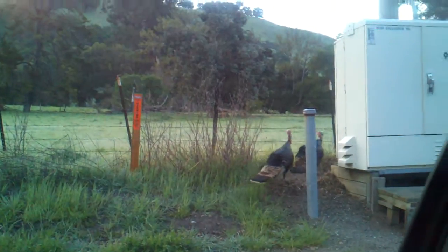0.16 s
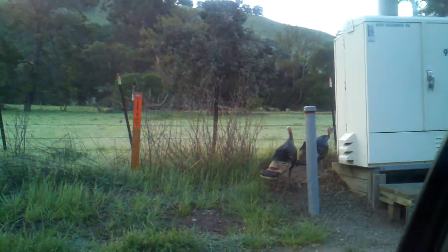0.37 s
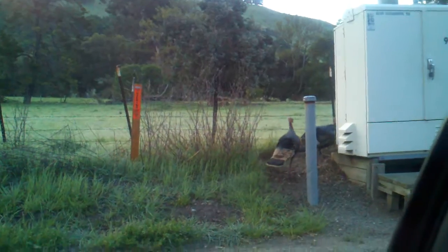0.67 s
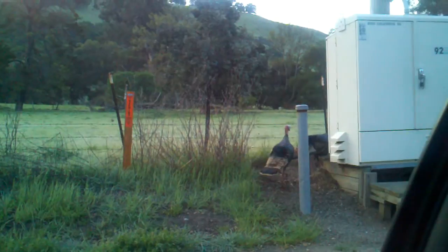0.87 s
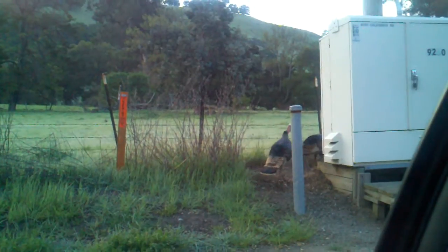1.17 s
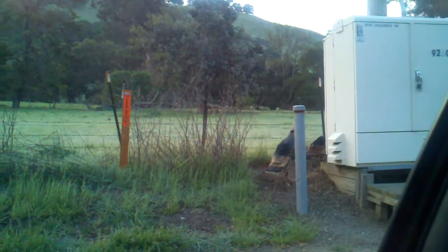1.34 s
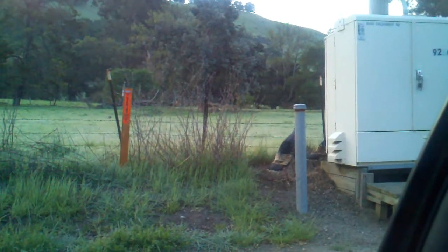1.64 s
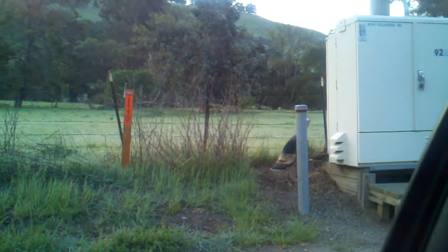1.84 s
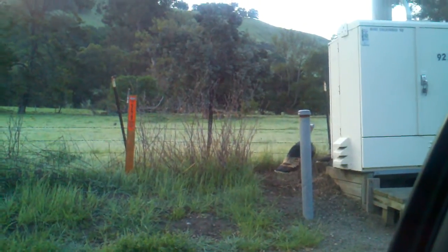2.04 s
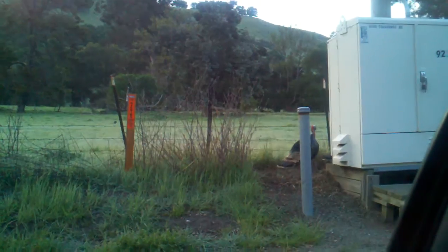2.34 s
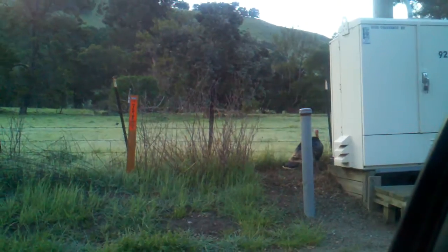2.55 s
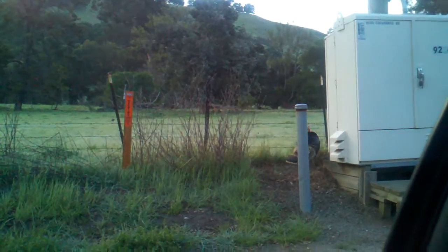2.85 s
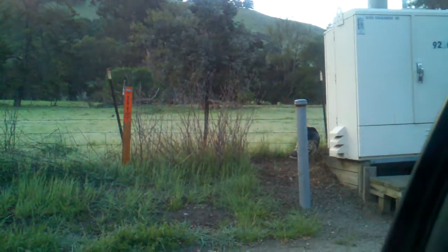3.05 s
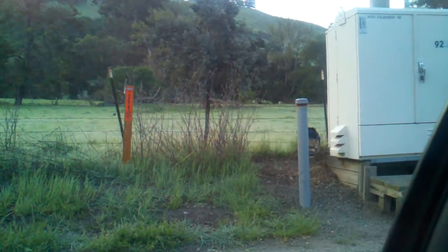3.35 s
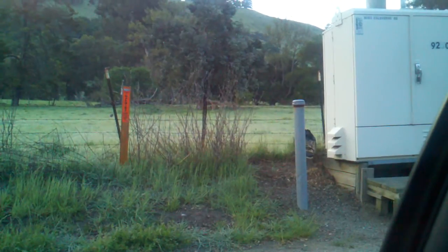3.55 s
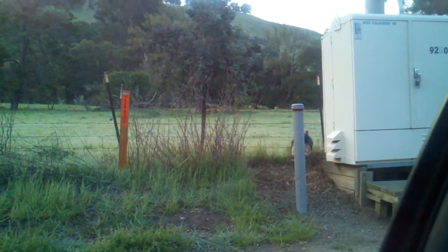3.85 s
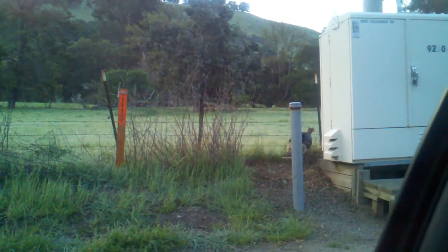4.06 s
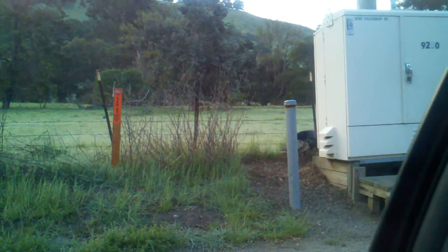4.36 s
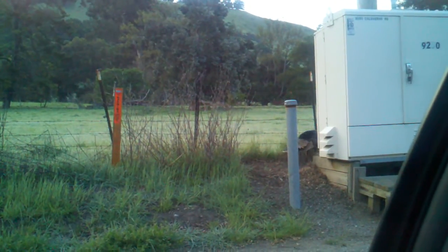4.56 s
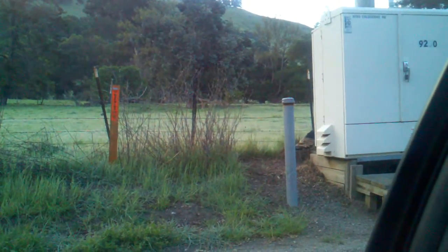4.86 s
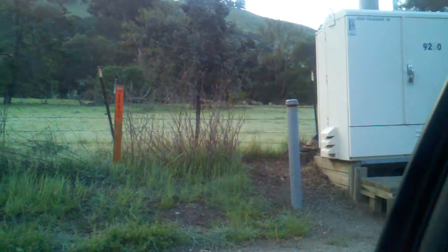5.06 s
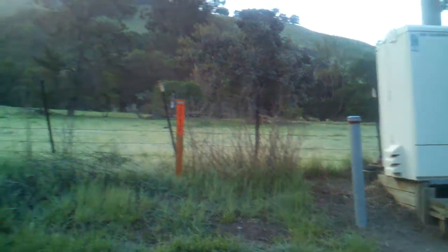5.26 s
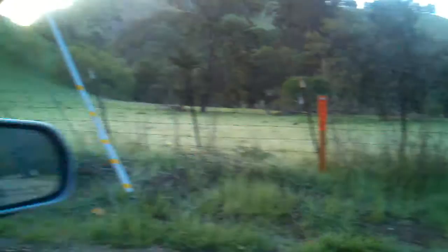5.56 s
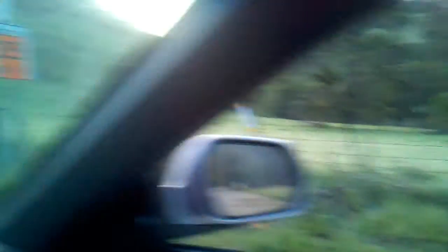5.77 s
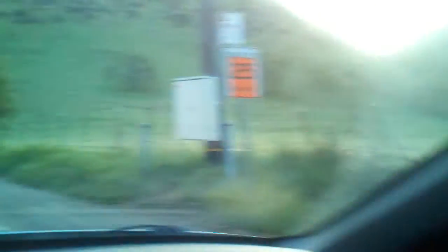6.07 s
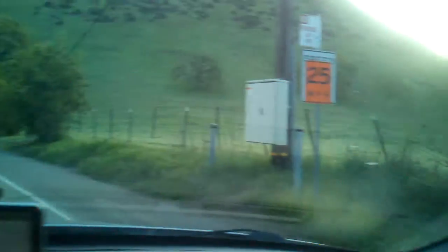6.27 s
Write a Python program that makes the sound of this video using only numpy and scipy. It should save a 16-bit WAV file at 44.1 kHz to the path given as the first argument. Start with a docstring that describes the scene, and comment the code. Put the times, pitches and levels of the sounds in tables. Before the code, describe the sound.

A quiet roadside heard from inside an idling car through its open window. A low, slightly wavering engine hum, soft rumble and faint bright hiss continue throughout, with a tiny tick near 0.4 s. At 1.0 s a turkey gobbles loudly, harsh and bright at first, then tumbling through rapid swooping yelps and hollow arched notes until about 1.95 s, with a short cabin ring. Thin, very high songbird whistles begin near 1.6 s and recur until about 4.7 s. A soft airy swish rises at 2.1 s and fades by 3 s. Faint turkey clucks come between 2.75 and 2.96 s and at 4.27 s; small crackles come at 3.1 s. Falling bird chips sound around 4.6, 5.4 and 6.2 s. From 5.2 to 5.7 s the handheld camera makes dull bumps, strongest near 5.35 s, plus a sharper tick at 5.65 s, then rustling grows until the end at about 6.4 s.

```python
"""A wild turkey gobbles once at a roadside, heard through the open window of an idling car.
The gobble tumbles through high swoops and low arched notes, summed from overtones and puffs of air.
Soft clucks and thin songbird whistles are gliding near-pure tones; a soft hiss swells after the gobble.
Small noise ticks come early, midway and near the end; a late turn of the camera brings bumps and a rustle.
Underneath are the engine's hum lines, a low rumble and a steady hiss in each channel."""
import sys
import numpy as np
from scipy import signal
from scipy.fft import rfft, irfft, next_fast_len
from scipy.io import wavfile
from scipy.ndimage import map_coordinates

SR = 44100
rng = np.random.default_rng(int(sys.argv[2]) if len(sys.argv) > 2 else 0)


def waveform_to_disk(signal):
    """Save audio, clipped to [-1, 1], as 16-bit WAV at the path in sys.argv[1]."""
    frames = np.transpose(np.atleast_2d(signal))
    scaled = np.clip(frames, -1, 1) * 32767
    samples = np.round(scaled).astype(np.int16)
    wavfile.write(sys.argv[1], SR, samples)


N = 283141  # length of the scene [samples]

# The low voice, one curve a note; most arch and droop: (time [s], pitch [Hz], level before the window [dB],
# octave overtone over that [dB], higher overtones over that before slope and throat [dB])
LOW_NOTES = [
    [(1.001, 594, -44, 3, -13), (1.014, 630, -47, 4, -2), (1.027, 621, -39, 3, -1.5),
     (1.040, 574, -42, 3, 6), (1.051, 495, -56, -12, 1)],
    [(1.062, 613, -58, 3, -2), (1.072, 680, -45, 4, 2), (1.081, 648, -48, 8, 3), (1.092, 665, -43, 11, -4),
     (1.101, 725, -34, 13, -12), (1.111, 718, -32.5, -6, -13), (1.129, 796, -29, -10, -19),
     (1.146, 700, -32, -16, -17), (1.158, 540, -44, -10, -14)],
    [(1.188, 747, -52, -8, -7), (1.197, 677, -36, -10, -10), (1.204, 607, -28.5, -10, -21),
     (1.212, 628, -47, 13.5, -1), (1.224, 660, -50.5, 10, -1), (1.236, 706, -44.5, 0, -4),
     (1.246, 687, -28, -21, -26), (1.254, 594, -41, -3, -5), (1.261, 527, -47, 7, -2)],
    [(1.276, 752, -48, -7, -9), (1.284, 655, -33, -10, -17), (1.295, 621, -28, -14, -9.5),
     (1.309, 660, -31.5, -17, -17), (1.32, 714, -33, -10, -17), (1.333, 678, -32, -30, -18),
     (1.345, 570, -34.5, -4, -12), (1.352, 507, -49, 4, -10)],
    [(1.382, 772, -54, -14, -14), (1.393, 625, -30.5, -18, -9.5), (1.401, 610, -29.5, -15, -10.5),
     (1.412, 530, -43, 6, -14)],
    [(1.430, 770, -43, -17, -15), (1.444, 623, -29.5, -11, -8), (1.456, 555, -33.5, -4, -21),
     (1.468, 600, -28, -12, -14), (1.48, 630, -30, -13, -10.5), (1.494, 695, -32.5, -17, -19),
     (1.51, 558, -33, -9, -9), (1.519, 480, -51, 11, -12)],
    [(1.548, 740, -59, -12, -15), (1.56, 631, -31, -13, -13.5), (1.569, 598, -31, -12, -12),
     (1.578, 500, -48, 7, -7)],
    [(1.594, 806, -49, -10, -18), (1.605, 666, -33.5, -14.5, -16), (1.613, 560, -36, -10, -11),
     (1.621, 487, -40, 1, -16)],
    [(1.645, 530, -39, -6, -8), (1.652, 575, -32.5, -15, -16), (1.661, 618, -29.5, -16, -15),
     (1.67, 646, -33.5, -10, -12.5), (1.685, 575, -30, -15, -16), (1.693, 480, -48, 7, -5)],
    [(1.718, 718, -52, -2, -25), (1.731, 597, -30, -17, -19), (1.739, 589, -38, -13, -3.5),
     (1.749, 490, -50, 2, 4)],
    [(1.823, 533, -50, -12, -20), (1.832, 520, -35.5, -13, -20), (1.842, 608, -34, -19, -17),
     (1.852, 622, -35.5, -12, -13.5), (1.862, 600, -38.5, -22, -13), (1.87, 523, -34, -10.5, -16),
     (1.876, 495, -53, -16, -16)],
]
# Throat and beak shape the higher overtones: (frequency [Hz], gain [dB])
THROAT_GAIN = [(1200, -4), (1550, -9), (1850, 0), (2100, -5), (2400, -5), (2800, -9), (3500, -3),
               (4200, -10), (6000, -18)]
PITCH_JITTER, STRAIN = .009, 2.5  # unsteadiness of the syrinx; its extra at the start, as a multiple
RUSH_S = .35  # the strain dies down as the air runs out [s]
SLOPE_DB = -16  # fall of the higher overtones [dB per octave]
BURST_DB, BURST_S = 17, .09  # the first push flattens that slope [dB per octave] and passes [s]
RATTLE, RATTLE_PER_S = .07, 520  # depth and pace [knots per s] of the throat's irregular rattle
EDGE_S = .002  # the syrinx opens and closes this quickly [s]


def low_voice(flutter_db=2, count=8):
    """Arched notes from one side of the syrinx, brighter and rougher at first; also its opening."""
    voice, opening = np.zeros(N), np.zeros(N)
    k = np.arange(1, count + 1)[:, None]  # multiples of the pitch
    for note in LOW_NOTES:
        t = np.arange(note[0][0], note[-1][0], 1 / SR)
        pitch, level_db, octave_db, higher_db = curves(note, t)
        age = t - LOW_NOTES[0][0][0]  # since the start of the call
        unsteady = 1 + STRAIN * np.exp(-age / RUSH_S)
        jittered_pitch = pitch * (1 + PITCH_JITTER * unsteady * waver(633, t))
        phase = 2 * np.pi * np.cumsum(jittered_pitch) / SR

        slope_db = SLOPE_DB + BURST_DB * np.exp(-age / BURST_S)
        throat_db = along(THROAT_GAIN, k * pitch)
        higher_db = higher_db + slope_db * np.log2(k / 3) + throat_db
        overtone_db = np.where(k == 2, octave_db, higher_db)
        # the membranes close unevenly, so the overtones flutter
        flutter = flutter_db * np.array([waver(260, t) for _ in k])
        overtone_db = (k > 1) * (overtone_db + flutter)

        rattle = 1 + RATTLE * unsteady * waver(RATTLE_PER_S, t)
        edges = np.minimum(np.minimum(t - t[0], t[-1] - t) / EDGE_S, 1)
        partials = amp(level_db + overtone_db) * rattle * edges
        add(voice, t[0], np.sqrt(2) * np.sum(partials * np.sin(k * phase), axis=0))
        add(opening, t[0], np.sin(phase))
    return voice, opening


# Short yelps of the high voice, most overlapping the start of a low note: (time [s], length [s],
# pitch halfway [Hz], slide [octaves per s], level of the fundamental before the window [dB])
HIGH_YELPS = [(1.186, .012, 1150, -22, -41), (1.240, .011, 1060, -14, -36), (1.280, .011, 1060, -18, -32),
              (1.381, .015, 1010, -18, -33.5), (1.429, .015, 1060, -14, -31.5),
              (1.548, .013, 1000, -18, -33.5), (1.591, .016, 980, -20, -35), (1.639, .012, 830, -6, -36.5),
              (1.718, .011, 990, -12, -31), (1.763, .013, 990, -12, -31), (1.823, .010, 780, -8, -35),
              (1.903, .019, 930, 6, -32.5)]
# Overtones of a yelp: (multiple of the pitch, level over the fundamental [dB])
YELP_PARTIALS = [(2, -18), (3, -26), (4, -38)]
SWOOP_S, SWOOP_OCTAVES, SWOOP_DB = .014, .45, -19  # a faint swoop from above leads into each yelp
YELP_ATTACK_S, YELP_RELEASE_S = .002, .005
YELP_JITTER, YELP_RATTLE = .018, .18  # unsteadiness of its pitch and strength


def high_voice():
    """Rough yelps from the other side of the syrinx; they beat against the low notes."""
    voice = np.zeros(N)
    for s, length, hz, slide, db in HIGH_YELPS:
        t = np.arange(-SWOOP_S, length + YELP_RELEASE_S, 1 / SR)
        swoop = SWOOP_OCTAVES * np.maximum(-t / SWOOP_S, 0)
        octaves = slide * (t - length / 2) + swoop
        pitch = hz * 2 ** octaves * (1 + YELP_JITTER * waver(RATTLE_PER_S, t))
        phase = 2 * np.pi * np.cumsum(pitch) / SR
        knots = [t[0], 0, YELP_ATTACK_S, length - YELP_RELEASE_S / 2, t[-1]]
        envelope = np.interp(t, knots, [0, amp(SWOOP_DB), 1, 1, 0])
        rattle = 1 + YELP_RATTLE * waver(RATTLE_PER_S, t)
        overtones = sum(amp(level) * np.sin(round(k) * phase) for k, level in YELP_PARTIALS)
        tone = np.sin(phase) + overtones
        add(voice, s - SWOOP_S, np.sqrt(2) * amp(db) * envelope * rattle * tone)
    return voice


# Air in the gobble: (time [s], level of the rasp before its trim [dB], level of the spray before its trim [dB])
AIR_LEVELS = [(0.99, -107, -84), (1.006, -89, -73), (1.03, -44.5, -56), (1.062, -57, -72), (1.08, -59, -67),
              (1.098, -47, -54.5), (1.134, -42.5, -51.5), (1.172, -71, -80), (1.184, -53, -65.5),
              (1.24, -57, -56), (1.26, -56, -67), (1.324, -46, -60.5), (1.368, -69, -75), (1.388, -48, -68),
              (1.422, -68, -68), (1.438, -45, -67), (1.454, -57, -66), (1.492, -53, -64.5),
              (1.538, -65, -83), (1.552, -59, -72), (1.608, -60, -73), (1.626, -60, -72), (1.67, -67, -68),
              (1.706, -75, -70), (1.734, -58, -73), (1.802, -77, -76), (1.854, -76, -70), (1.892, -84, -74),
              (1.918, -62, -75), (1.96, -72, -72)]
# Colour of the rasp: (frequency [Hz], relative density [dB])
RASP_COLOUR = [(400, -32), (900, 5), (1500, -6), (2200, 3), (3000, 0), (3600, 5), (4400, -6), (5500, -4),
               (9000, -31)]
# Colour of the fine spray: (frequency [Hz], relative density [dB])
SPRAY_COLOUR = [(3000, -10), (5000, 3), (7000, 3.5), (10000, 3.5), (14000, -5.5)]
RASP_TRIM_DB, SPRAY_TRIM_DB = -4, 2


def gobble():
    """Both voices, with a rasp and a fine spray of air that escape once a cycle of the low voice."""
    low, opening = low_voice()
    t = np.arange(N) / SR
    rasp_db, spray_db = curves(AIR_LEVELS, t)
    puffs = unit((1 + .6 * opening) * amp(2 * wobble(250)))
    puffs = puffs * (t > AIR_LEVELS[0][0]) * (t < AIR_LEVELS[-1][0])
    rasp = amp(RASP_TRIM_DB + rasp_db) * noise(RASP_COLOUR)
    spray = amp(SPRAY_TRIM_DB + spray_db) * noise(SPRAY_COLOUR)
    return low + high_voice() + puffs * (rasp + spray)


# Ringing of the car's inside: (frequency [Hz], width [Hz], level over the direct sound [dB])
CABIN_MODES = [(660, 46, -14.5), (1048, 74, -2), (1800, 180, 0.5), (2850, 210, 6), (3480, 86, -4)]


def cabin_ring(hz):
    """The direct sound plus the resonances of the car's inside."""
    ring = 1
    for centre, width, db in CABIN_MODES:
        damping = 1j * hz * width
        ring = ring + amp(db) * damping / (centre * centre - hz * hz + damping)
    return ring


# Soft turkey clucks: (time [s], length [s], start [Hz], middle [Hz], end [Hz], level before the window [dB])
CLUCK_NOTES = [(2.757, 0.04, 1160, 857, 785, -60), (2.865, 0.02, 910, 1085, 860, -51),
               (2.945, 0.0147, 730, 820, 1110, -54), (4.265, 0.015, 1080, 1070, 965, -62.5)]
# The way in through the window: (frequency [Hz], gain [dB])
WINDOW_GAIN = [(300, -13), (430, -7.5), (540, -2.5), (640, -2), (780, 1), (1050, -3), (1250, -3),
               (1430, -1.5), (1620, -6), (1850, -4), (2300, 0.5), (2700, -3), (3500, -2.5), (14000, 0)]
# First bounces between the panes: (frequency [Hz], time to fall 60 dB [s])
PANES_DECAY = [(500, .035), (1100, .04), (4000, .04), (12000, .025)]
# Reverberation of the cabin: (frequency [Hz], time to fall 60 dB [s])
CABIN_DECAY = [(200, .12), (600, .2), (1000, .16), (4000, .15), (12000, .08)]


def turkey(wet_db=-13):
    """Gobble and clucks come in through the window and ring briefly in the cabin."""
    clucks = glides(CLUCK_NOTES, waver_depth=.03, waver_rate=400, flutter_db=1.5)
    call = filtered(gobble() + clucks, lambda hz: amp(along(WINDOW_GAIN, hz)) * cabin_ring(hz))
    # glass throws back the overtones more than the fundamental: (frequency [Hz], gain [dB])
    glass = [(700, -16), (1100, -12), (1500, -14), (2200, -9), (3500, -6)]
    bounces = filtered(echo(call, PANES_DECAY), lambda hz: amp(along(glass, hz)))
    return call + bounces + amp(wet_db) * echo(call, CABIN_DECAY)


# Songbird whistles, and a second bird's lower answers near 7 to 8 kHz: (time [s], length [s],
# pitch halfway [Hz], fall from start to end [Hz], level before the direct and tree gains [dB])
WHISTLE_NOTES = [(1.568, .18, 9530, 198, -59), (1.814, 0.077, 9150, -200, -63.5),
                 (1.885, 0.12, 9270, 257, -61), (1.976, 0.043, 8950, 197, -63),
                 (2.082, 0.073, 7300, 62, -72), (2.43, 0.3, 9250, 302, -64.5),
                 (2.738, 0.14, 7970, -200, -63.5), (2.903, 0.032, 8150, 303, -60),
                 (3.438, 0.094, 9070, 30, -57.5), (3.503, 0.14, 8805, 334, -54),
                 (3.43, 0.24, 7700, 380, -74), (3.638, 0.11, 7960, 250, -63), (3.765, .05, 8130, -300, -60),
                 (4.294, .1, 8920, 77, -60.5), (4.374, 0.14, 8670, 336, -61.5),
                 (4.518, 0.15, 7780, 418, -65)]
# Another small bird's falling chips: (time [s], pitch halfway [Hz], direct level [dB])
CHIP_NOTES = [(4.608, 3460, -65), (4.640, 3300, -66), (5.394, 3700, -57), (5.422, 3670, -57),
              (5.459, 3540, -65), (6.198, 3730, -70), (6.234, 3620, -65), (6.270, 3540, -71)]
# Tail among the trees: (frequency [Hz], time to fall 60 dB [s])
TREES_DECAY = [(1000, .35), (9000, .42)]
WHISTLE_BOW_HZ = 40.4  # arch of each whistle
CHIP_S, CHIP_FALL_HZ, CHIP_BOW_HZ = .015, 680, 90  # length, fall and arch of every chip


def songbirds(direct_db=-3, wet_db=-5, chip_wet_db=-12):
    """Thin whistles and short chips, smeared by the trees."""
    whistle_rows = [falling(*row, bow_hz=WHISTLE_BOW_HZ) for row in WHISTLE_NOTES]
    chip_rows = [falling(s, CHIP_S, hz, CHIP_FALL_HZ, db, bow_hz=CHIP_BOW_HZ) for s, hz, db in CHIP_NOTES]
    song = glides(whistle_rows, waver_depth=.007, waver_rate=300, flutter_db=3)
    chips = glides(chip_rows, waver_depth=.014, waver_rate=600, flutter_db=2)
    tail = echo(amp(wet_db) * song + amp(chip_wet_db) * chips, TREES_DECAY)
    return amp(direct_db) * song + chips + tail


def falling(s, length, hz, fall_hz, db, bow_hz=0):
    """A glide row that falls through its pitch (rises if the fall is negative), both ends bowed down."""
    return s, length, hz + fall_hz / 2 - bow_hz, hz, hz - fall_hz / 2 - bow_hz, db


def glides(rows, waver_depth, waver_rate, flutter_db):
    """Nearly pure notes that bend through three pitches."""
    out = np.zeros(N)
    for s, length, start_hz, middle_hz, end_hz, db in rows:
        u = np.linspace(0, 1, int(length * SR))
        bend = np.polyfit([0, .5, 1], [start_hz, middle_hz, end_hz], 2)
        pitch = np.polyval(bend, u) * (1 + waver_depth * wobble(waver_rate, size=len(u)))
        flutter = flutter_db * wobble(62.0, size=len(u))
        loudness = amp(db + flutter) * signal.windows.tukey(len(u), .3)
        add(out, s, np.sqrt(2) * loudness * np.sin(2 * np.pi * np.cumsum(pitch) / SR))
    return out


# Bumps of the camera: (time [s], level before knock and scuff trims [dB],
# time for the scuff to fall 60 dB [s], pitch of the knock as a multiple)
CAMERA_BUMPS = [(5.190, -43.5, 0.15, 1), (5.282, -46.5, .12, 1), (5.342, -35, .14, 1.08),
                (5.355, -43.5, .1, .95), (5.374, -40, 0.064, .85), (5.389, -38, 0.059, 1),
                (5.417, -46.5, 0.15, .9), (5.680, -43, 0.24, 1.1)]
# The knock of the camera in the hand: (frequency [Hz], relative level [dB], time to fall 60 dB [s])
CAMERA_BODY = [(132, -4, 0.27), (178, 1.5, 0.14), (253, 5.5, 0.054), (411, -10.5, 0.13),
               (575, -15.5, 0.061)]
# Colour of the scuff: (frequency [Hz], relative density [dB])
SCUFF_COLOUR = [(50, -20), (80, -9), (128, -1), (180, 0), (230, -4), (280, -2), (350, -12), (430, -10),
                (600, -20), (1200, -29), (2500, -42), (5000, -54), (14000, -62)]
BUMP_RISE_S = .004  # soft contact rounds off the start of each bump [s]
KNOCK_TRIM_DB, SCUFF_TRIM_DB = 4, -1


def bumps():
    """Dull knocks: the camera body's decaying modes, each with a scuff of noise."""
    knocks, scuffs = np.zeros(N), np.zeros(N)
    age = np.arange(SR // 2) / SR
    for s, db, t60, pitch in CAMERA_BUMPS:
        press = amp(db) * np.minimum(age / BUMP_RISE_S, 1)
        ring = sum(amp(level - 60 * age / life) * np.sin(2 * np.pi * pitch * hz * age)
                   for hz, level, life in CAMERA_BODY)
        add(knocks, s, amp(KNOCK_TRIM_DB) * press * ring)
        add(scuffs, s, amp(SCUFF_TRIM_DB - 60 * age / t60) * press)
    return knocks + scuffs * noise(SCUFF_COLOUR)


# Levels through the turn, also followed by the car: (time [s], gain of the hum [dB], level of the rustle [dB])
TURN_LEVELS = [(0, 3.5, -62.5), (5.0, 3.5, -63), (5.2, 7, -61), (5.36, 0, -53), (5.55, 3.5, -58),
               (5.85, 0, -58), (6.05, -3, -51.5), (6.25, -3, -50.5), (6.42, -3.5, -48)]
# Colour of the rustle: (frequency [Hz], relative density [dB])
RUSTLE_COLOUR = [(150, 26), (350, 26.5), (700, 9.5), (1300, 2.5), (2500, 0), (5000, -3), (8000, -1.5),
                 (14000, -2)]


def handling():
    """The late turn of the camera: dull knocks and a sleeve's rustle of uneven noise, faint until then."""
    _, rustle_db = curves(TURN_LEVELS, np.arange(N) / SR)
    rustle = amp(rustle_db + 1.3 * wobble(20)) * noise(RUSTLE_COLOUR)
    return rustle + bumps()


# Small ticks and crackles, early, midway and near the end:
# (time [s], level [dB], time to fall 60 dB [s], centre frequency [Hz])
SMALL_TICKS = [(.358, -57, .02, 2000), (3.122, -58, .06, 2000), (3.130, -60, .08, 6300),
               (3.145, -63, .09, 6200), (3.136, -63, .04, 3900), (3.165, -61, .04, 2200),
               (5.652, -47.5, .014, 2100), (5.673, -60, .04, 2600)]


def ticks():
    """Bursts of noise around a centre frequency that start at once and die away."""
    out, t = np.zeros(N), np.arange(N) / SR
    for s, db, t60, hz in SMALL_TICKS:
        decay = (t > s) * amp(-60 * np.abs(t - s) / t60)
        colour = [(hz / 4, -18), (hz, 0), (hz * 1.5, -12), (hz * 4, -24)]
        out += amp(db) * decay * noise(colour)
    return out


# Colour of the swish: (frequency [Hz], relative density [dB])
SWISH_COLOUR = [(500, -14), (1400, 9), (2200, 6), (3200, 6.5), (5000, -3.5), (7500, 3), (11500, 0),
                (14000, -3)]
SWISH_S, SWISH_RISE_S, SWISH_HOLD_S, SWISH_FADE_S = 2.06, 0.078, 0.33, 0.53  # start, then durations [s]
SWISH_DB = -64  # level while held, give or take a slight wobble


def swish():
    """A soft, broad hiss that comes up quickly after the gobble, holds and fades."""
    knots = SWISH_S + np.cumsum([0, SWISH_RISE_S, SWISH_HOLD_S, SWISH_FADE_S])
    envelope = np.interp(np.arange(N) / SR, knots, [0, 1, 1, 0])
    return amp(SWISH_DB + wobble(19)) * envelope * noise(SWISH_COLOUR)


# Hum lines of the engine: (frequency [Hz], level before the turn's gain [dB])
ENGINE_LINES = [(68.6, -80), (160.2, -52.5), (361, -74.5)]
# Colour of the rumble: (frequency [Hz], relative density [dB])
RUMBLE_COLOUR = [(20, -23), (50, -17), (85, -9), (115, 0), (140, -1), (170, -6), (210, -11), (265, -11),
                 (330, -19), (600, -31), (760, -28), (1400, -38), (3300, -43), (5000, -54), (14000, -62)]
RUMBLE_DB = -48  # level before its swell


def car():
    """The idling car: slightly wavering hum lines over a low rumble."""
    t = np.arange(N) / SR
    hum_db, _ = curves(TURN_LEVELS, t)
    hum = sum(amp(db + 1.5 * wobble(9)) * np.sin(2 * np.pi * hz * t + .3 * wobble(5))
              for hz, db in ENGINE_LINES)
    swell_db = .4 * hum_db + .9 * wobble(8)  # the rumble follows the turn less than the hum does
    return np.sqrt(2) * amp(hum_db) * hum + amp(RUMBLE_DB + swell_db) * noise(RUMBLE_COLOUR)


# Colour of the steady hiss: (frequency [Hz], relative density [dB])
HISS_COLOUR = [(1000, -12), (3000, -5), (5000, -4), (7000, 0), (11000, .5), (14000, 1.5)]
HISS_DB = -70


def hiss():
    """Steady bright noise, drawn afresh for each channel."""
    return amp(HISS_DB) * noise(HISS_COLOUR)


def amp(db):
    """Decibels to amplitude."""
    return 10 ** (np.asarray(db) / 20)


def unit(x):
    """x scaled to rms 1."""
    return x / np.sqrt(np.mean(x ** 2) + 1e-20)


def along(points, hz):
    """(frequency [Hz], value) points read on a log axis."""
    f, v = np.transpose(points)
    return np.interp(np.log(hz + 1), np.log(f + 1), v)


def curves(rows, t):
    """Each column after the time, read at times t."""
    s, *cols = np.transpose(rows)
    return [np.interp(t, s, c) for c in cols]


def wobble(rate, size=N):
    """A smooth random curve, rate knots a second."""
    knots = rng.standard_normal(int(size * rate / SR) + 4)
    return map_coordinates(knots, [np.arange(size) * rate / SR])


def waver(rate, t):
    """A wobble as long as the short time axis t."""
    return wobble(rate, size=SR // 4)[:len(t)]


def filtered(x, response):
    """x times a complex response of frequency."""
    m = next_fast_len(N + SR // 2)
    return irfft(rfft(x, m) * response(np.fft.rfftfreq(m, 1 / SR)), m)[..., :N]


def noise(spectrum):
    """Coloured noise of rms 1."""
    return unit(filtered(rng.standard_normal(N), lambda hz: amp(along(spectrum, hz))))


def add(track, s, x):
    """Mix x into the track at time s."""
    part = track[round(s * SR):][:len(x)]
    part += x[:len(part)]


def echo(x, t60):
    """A diffuse tail in which each frequency dies at its own speed."""
    hz, t, z = signal.stft(rng.standard_normal(SR // 2), SR, nperseg=256)
    decay = amp(-60 * t / along(t60, hz)[:, None])
    tail = signal.istft(z * decay, SR, nperseg=256)[1]
    return signal.fftconvolve(x, tail / np.linalg.norm(tail))[:N]


# Right microphone channel behind the left: (frequency [Hz], delay [s])
RIGHT_LAG = [(100, .00058), (300, .00059), (650, .00052), (1100, .00042), (1500, .00036), (2000, .0004),
             (2650, .000379), (14000, .000379)]
RIGHT_DB = .45  # gain of the right channel over the left
SCATTER_DB = -21  # bounces that reach each channel on their own


def scene():
    """The right channel is later and of opposite polarity; each has its own hiss and bounces."""
    call = turkey()
    left = call + songbirds() + handling() + ticks() + swish() + car()
    right = amp(RIGHT_DB) * filtered(left, lambda hz: -np.exp(-2j * np.pi * hz * along(RIGHT_LAG, hz)))
    return np.array([side + amp(SCATTER_DB) * echo(call, PANES_DECAY) + hiss() for side in (left, right)])


TOP_HZ = 14000  # band limit of the camera


def record(dry):
    """The camera keeps nothing above its band limit."""
    return filtered(dry, lambda hz: hz < TOP_HZ)


dry = scene()
out = record(dry)
waveform_to_disk(out)
```